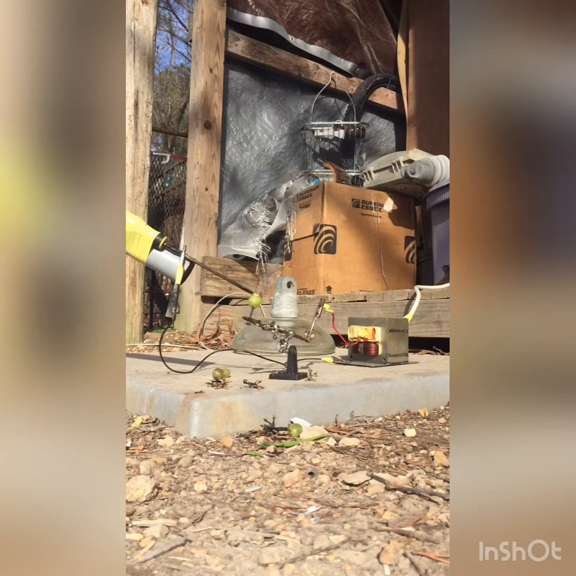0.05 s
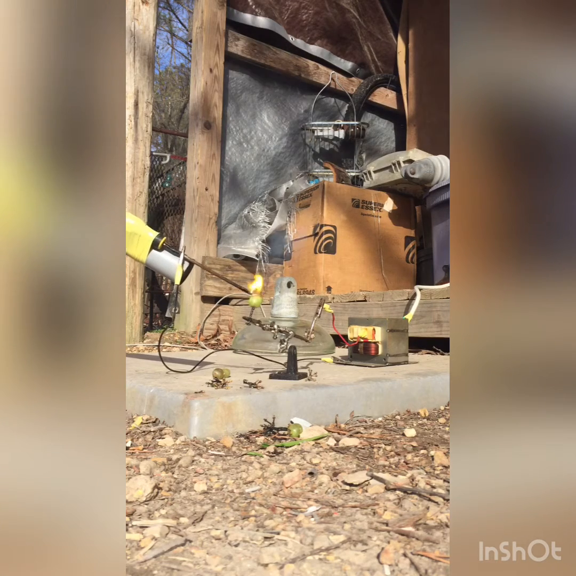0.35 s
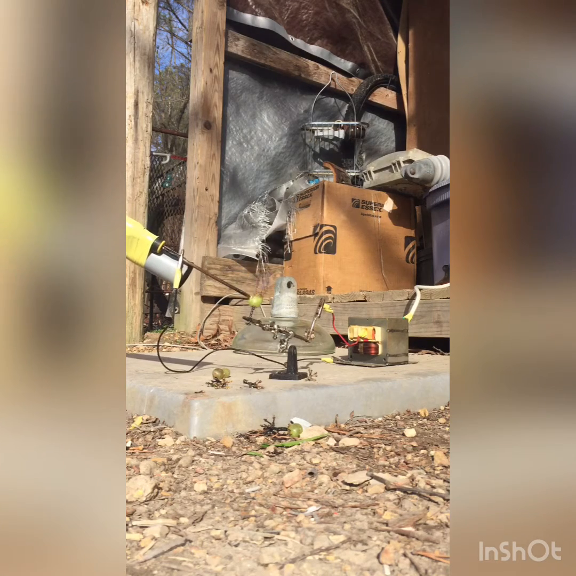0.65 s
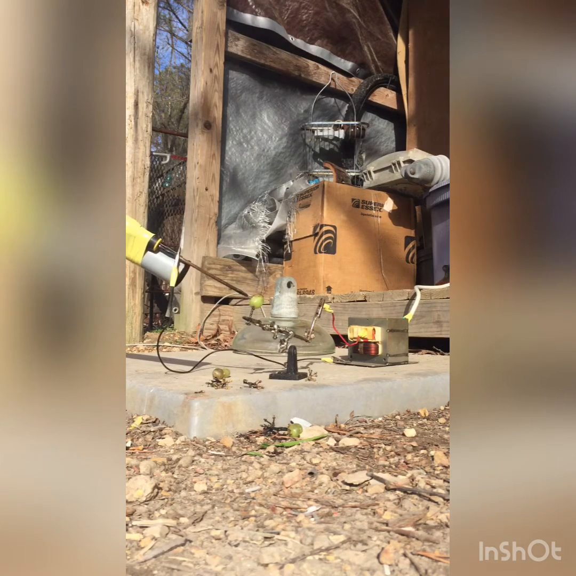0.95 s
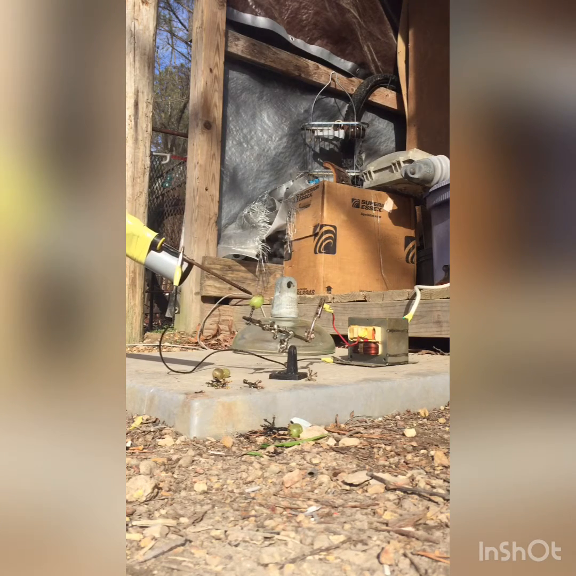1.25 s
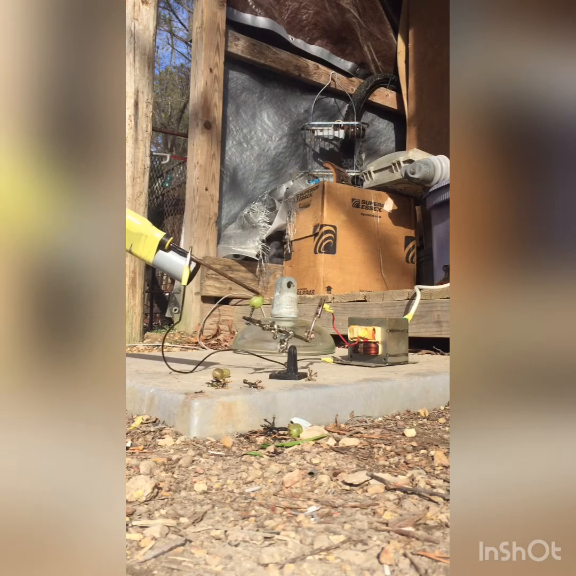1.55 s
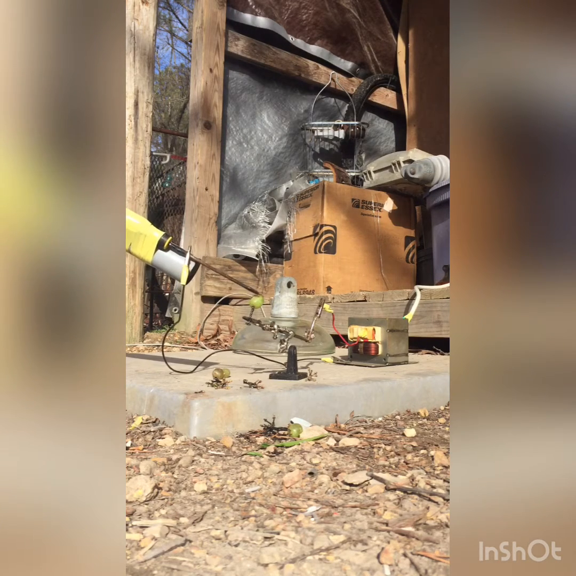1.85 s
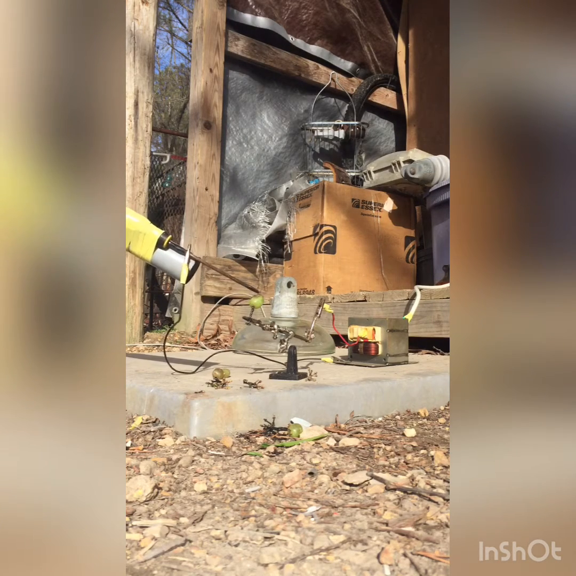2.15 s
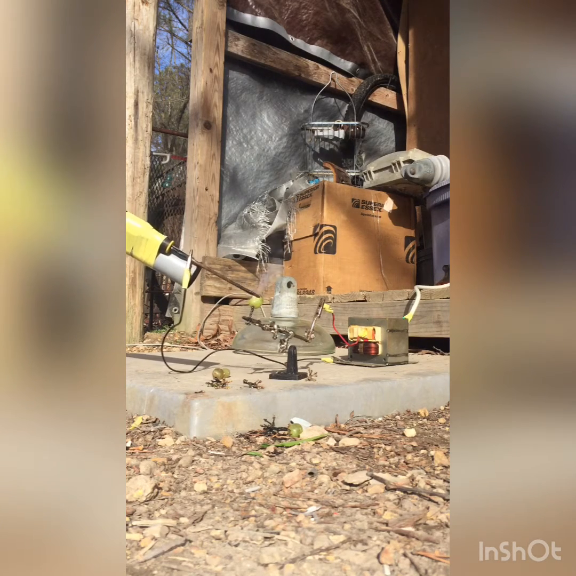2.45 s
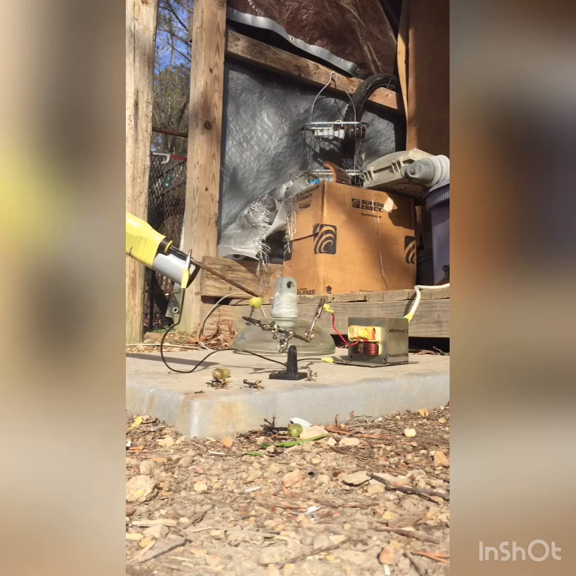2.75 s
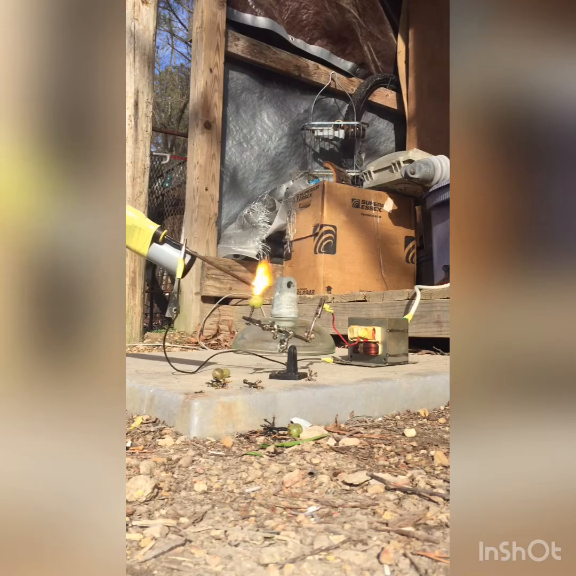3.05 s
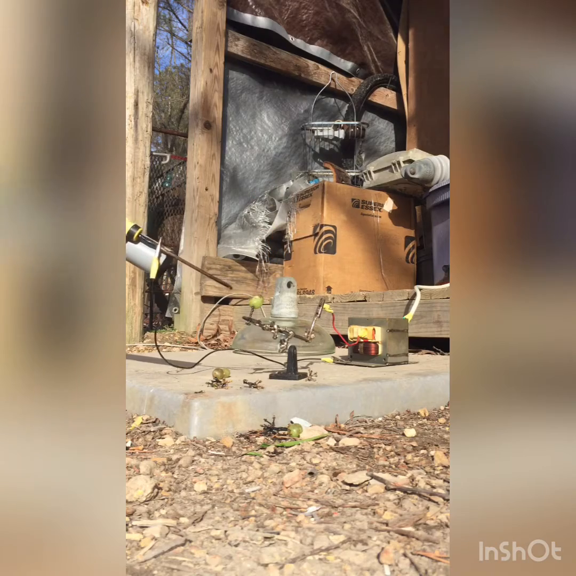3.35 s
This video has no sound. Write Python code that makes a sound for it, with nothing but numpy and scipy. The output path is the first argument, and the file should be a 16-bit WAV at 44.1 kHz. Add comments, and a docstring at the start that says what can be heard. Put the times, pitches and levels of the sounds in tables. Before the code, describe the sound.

Close electric arcing crackles in an uneven burst with sharp snaps, leaving only a low motor drone and a faint, distant bird in a yard. Two more spits follow, then a rising mains buzz that cuts off.

```python
"""Outdoors by a shed, a brief hiss dies away over a droning motor and a far bird calls.
A hand-held electrode draws a mains arc from a transformer. Each half cycle relights the gap: it
sizzles, snaps and sets off a short hollow ring, while the hot air hums at twice the mains rate.
The arc stops, the bird calls again and a soft rumble passes. Then a second arc is drawn:
it spits twice, stretches into a smooth, swelling buzz and goes out."""
import sys
import numpy as np
from scipy import signal
from scipy.fft import rfft, irfft
from scipy.io import wavfile
from scipy.ndimage import uniform_filter1d

SR = 44100
rng = np.random.default_rng(int(sys.argv[2]) if len(sys.argv) > 2 else 0)


def store_wav(level_fs):
    """Save 16-bit WAV to argv[1]."""
    pcm = np.round(np.clip(np.atleast_2d(level_fs), -1, 1) * 32767)
    wavfile.write(sys.argv[1], SR, pcm.T.astype(np.int16))


N = 158760
MAINS_HZ = 60


def undb(db):
    """Decibels to gain."""
    return 10 ** (np.asarray(db) / 20)


def unit(x):
    """Scale to rms 1."""
    return x / np.sqrt(np.mean(x ** 2))


def clock():
    """Time of every sample."""
    return np.arange(N) / SR


def noise():
    """White noise, the length of the scene."""
    return rng.standard_normal(N)


def fade(t60_s):
    """Exponential decay from 1."""
    return np.exp(-np.log(1000) * clock() / t60_s)


def through(x, response):
    """Pass a sound through an impulse response."""
    return signal.fftconvolve(x, response)[:N]


def filtered(x, order, hz, kind):
    """Low-, high- or band-pass a sound."""
    return signal.sosfilt(signal.butter(order, hz, kind, fs=SR, output="sos"), x)


def colour(points, size=2048):
    """Impulse response of unit energy that follows an EQ curve."""
    hz, db = np.array(points).T
    bins = np.maximum(np.fft.rfftfreq(size, 1 / SR), 1)
    curve_db = np.interp(np.log(bins), np.log(hz), db)
    cepstrum = irfft(np.log(undb(curve_db)))
    cepstrum[1:size // 2] *= 2  # minimum phase keeps the attack sharp
    cepstrum[size // 2 + 1:] = 0
    return unit(irfft(np.exp(rfft(cepstrum)))) / np.sqrt(size)


def walk(rate_hz):
    """Random drift, spread near 1."""
    hold = int(SR / rate_hz)
    steps = rng.standard_normal(N // hold + 1)
    return uniform_filter1d(np.repeat(steps, hold), hold)[:N]


def clicks(times, sizes):
    """One impulse at each time."""
    return np.bincount(np.clip(times * SR, 0, N - 1).astype(int), sizes, N)


def swell(times, level_db):
    """Gain along a level curve, silent outside it."""
    t = clock()
    return undb(np.interp(t, times, level_db)) * (t > times[0]) * (t < times[-1])


def opening_hiss(level_db=-46.5, t60_s=.25):
    """A hiss dies away, coloured like the crack and ring of the sparks."""
    hiss = through(noise(), colour(CRACK_EQ)) + undb(5.5) * through(noise(), colour(RING_EQ))
    return undb(level_db) * fade(t60_s) * hiss


# Partials of the motor, before its trim: pitch_hz, level_db
MOTOR_PARTIALS = [(58.6, -54.5), (85.9, -52.5), (120.3, -51.5), (171, -48.5), (240.6, -51.5), (360.1, -58),
                  (720.1, -68)]
def motor(trim_db=-3.5, waver_db=2):
    """A motor drones, each partial wavering in level and phase."""
    drone = np.zeros(N)
    for pitch_hz, level_db in MOTOR_PARTIALS:
        gain = undb(level_db + trim_db + waver_db * walk(28))
        drone += gain * np.sin(2 * np.pi * pitch_hz * clock() + walk(4.7))
    return np.sqrt(2) * drone


# Bass-heavy tone of the outdoor air: frequency_hz, gain_db
YARD_EQ = [(25, -23), (50, -7.5), (90, -4), (170, -9.5), (260, -8.5), (330, -24.5), (430, -34.5),
           (800, -34), (1500, -41.5), (6000, -46), (16000, -56.5)]
def yard_air(level_db=-50.5, waver_db=.7):
    """A low bed of outdoor noise, gently wavering."""
    return undb(level_db + waver_db * walk(5)) * through(noise(), colour(YARD_EQ))


# Faint calls of the far bird: middle_s, level_db
BIRD_CALLS = [(.11, -63.5), (1.158, -67)]
def bird(pitch_hz=1536, width_hz=110, spread_s=.07):
    """Hoarse calls blurred by distance: a narrow band of noise fades in and out."""
    voice = unit(signal.lfilter(*signal.iirpeak(pitch_hz, pitch_hz / width_hz, SR), noise()))
    return voice * sum(undb(db) * np.exp(-.5 * ((clock() - s) / spread_s) ** 2) for s, db in BIRD_CALLS)


# Breakdowns of the gap: start_s, length_s, shower_db, thump_db
FLARES = [(0.198, 0.0049, -20, -21.5), (0.732, 0.0047, -7, -10), (0.919, .003, -19.5, -23),
          (0.965, 0.0059, -12.5, -26.5), (2.4798, 0.005, -12.5, -31), (2.848, 0.0037, -23, -25.5)]
def with_flares(gain):
    """The gap breaks down in dense showers of sparks: short bursts on top of the sizzle's gain."""
    t = clock()
    for start_s, length_s, shower_db, _ in FLARES:
        gain = np.hypot(gain, undb(shower_db) * (t > start_s) * (t < start_s + length_s))
    return gain


# Mix of the arc, each row held until the next: start_s, sizzle_db, crackle_db, hum_db
ARC_STAGES = [(0.201, -25, -34, -19.5), (0.216, -19, -27.5, -23), (0.451, -29, -33.5, -26.5),
              (.590, -31.5, -32, -29), (0.642, -27, -28, -29), (0.737, -19, -26, -22.5),
              (0.875, -42.5, -43, -30), (.916, -22.5, -27.5, -21.5), (0.974, -92.5, -84.5, -95),
              (2.481, -22, -27.5, -24), (2.622, -49, -46.5, -89.5), (2.85, -20, -26.5, -23),
              (2.959, -49, -51, -86), (3.305, -53.5, -56, -90), (3.34, -67, -78, -88)]
def arc_gains(times):
    """Sizzle, crackle and hum gains; the near-silent last row also holds before the first strike."""
    rows = np.array(ARC_STAGES)
    current = np.searchsorted(np.sort(rows[:, 0]), times) - 1
    return undb(rows[current, 1:]).T


def relightings(first_s=.0011):
    """The gap relights every half cycle: the times, and 1 where the half cycle is the weak one."""
    count = np.arange(int(N / SR * 2 * MAINS_HZ))
    return first_s + count / (2 * MAINS_HZ), count % 2


# Bright, frying tone of the tiny sparks: frequency_hz, gain_db
SIZZLE_EQ = [(900, -38), (1420, -19.5), (1720, -9.5), (2100, -16), (2300, -9), (2650, -19), (3300, -6.5),
             (5400, -2), (6800, -1.5), (7700, -12.5), (9400, 0), (10400, -4.5), (11600, 1), (13000, -6),
             (16000, -10)]
def sizzle(puff_spread_s=.0017, weak_half_db=-9, scatter_db=1.68, floor_db=-18.5,
           grain_db=4, spit_db=3, dull_below_db=-33):
    """A puff of tiny sparks each half cycle, stronger on one polarity."""
    times, weak = relightings()
    sizes = undb(weak_half_db * weak + scatter_db * rng.standard_normal(len(times)))
    puff = signal.windows.gaussian(SR // MAINS_HZ, puff_spread_s * SR)
    puffs = signal.fftconvolve(clicks(times, sizes), puff, "same")
    gain = with_flares(unit(puffs + undb(floor_db)) * arc_gains(clock())[0])
    shower = gain * unit(noise() * undb(grain_db * noise() + spit_db * walk(2500)))
    brightness = gain / (gain + undb(dull_below_db))  # a weak arc loses its treble
    dull = filtered(shower * (1 - brightness), 1, 6000, "low")
    return through(shower * brightness + dull, colour(SIZZLE_EQ))


# Sharp attack of a spark: frequency_hz, gain_db
CRACK_EQ = [(500, -20), (1700, -14.5), (2600, -10.5), (3400, -3), (5300, 1.5), (6600, 0), (7600, -14),
            (9300, -1.5), (10600, -8), (11500, -10.5), (12800, -11), (16000, -13)]
# Hollow body of a spark: frequency_hz, gain_db
RING_EQ = [(60, -17), (185, 3.5), (250, -11), (345, -2), (460, -5), (550, -10.5), (730, 2), (860, -13),
           (990, -1), (1075, 4), (1200, -10.5), (1420, -30.5), (1680, -12), (2000, -17), (2600, -22.5),
           (8000, -60.5)]
def sparks(times, crack_gains, ring_gains, ring_lag_s=.00037, detune=.014):
    """Each spark is one pressure pulse: a crack, then a ring whose pitch shifts as the arc wanders."""
    rings = np.zeros(2 * N)
    for start_s, gain, shift in zip(times, ring_gains, rng.standard_normal(len(times))):
        ring = colour(np.array(RING_EQ) * [1 + detune * shift, 1])
        start = max(int((start_s + ring_lag_s) * SR), 0)
        rings[start:start + len(ring)] += gain * ring
    cracks = through(clicks(times, crack_gains), colour(CRACK_EQ))
    return -cracks - rings[:N]


# Single sharp sparks: start_s, crack_db, ring_db
SNAPS = [(0.2007, -1.5, 5), (0.4011, 3, 8), (0.4246, 5, 0), (0.4338, 4.5, 0), (0.4506, -2, 2.5),
         (0.4666, -6.5, 5.5), (0.485, -7.5, -1.5), (0.5014, 0, 8.5), (0.518, 2.5, 6.5), (0.5329, -3, 4.5),
         (0.5511, 4.5, 4.5), (0.5684, 0.5, 7), (0.584, -5.5, 1.5), (0.6171, 0, 4.5), (0.6505, 4, 7.5),
         (0.6661, 2, 5), (0.6834, 3, 1.5), (0.7006, 0.5, 5.5), (0.7351, -3, 8.5), (0.8767, 1, 7),
         (0.8951, -4, 4.5), (0.9356, 4.5, 6), (0.9519, 5.5, 7), (0.9681, 1.5, -0.5), (2.4845, 6.5, 11.5),
         (2.6184, -1, 5), (2.851, 3.5, 10)]
def snaps():
    """The big sparks that stand out of the crackle."""
    start_s, crack_db, ring_db = np.array(SNAPS).T
    return sparks(start_s, undb(crack_db), undb(ring_db))


def crackle(lag_s=.0008, jitter_s=.0009, scatter_db=4, weak_half_db=7.5,
            crack_db=-4.5, crack_scatter_db=10):
    """Small, uneven sparks, one a half cycle, tend to trail the puff and favour the weak half."""
    times, weak = relightings()
    size, shift, sharpness = rng.standard_normal((len(times), 3)).T
    start_s = times + lag_s + jitter_s * shift
    sizes = unit(undb(scatter_db * np.tanh(size) + weak_half_db * weak))
    ring_gains = arc_gains(start_s)[1] * sizes * np.sqrt(N / len(times))
    crack_ratios = undb(crack_db) * unit(undb(crack_scatter_db * np.tanh(sharpness)))
    return sparks(start_s, crack_ratios * ring_gains, ring_gains)


# Overtones that turn the hum into a buzz: harmonic_number, relative_db
BUZZ_OVERTONES = [(2, -3), (3, 0.5), (4, -7.5), (5, -8), (6, 0.5), (7, -15.5), (8, -8.5), (9, -13.5),
                  (10, -24.5), (14, -27.5)]
# The last arc burns calmly, then is drawn out until it breaks: time_s, hum_db, buzz_db
ARC_STRETCH = [(2.62, -44, -50.5), (2.84, -40, -53), (2.97, -36.5, -50.5), (3.07, -37, -48),
               (3.17, -28.5, -40.5), (3.259, -19.5, -36), (3.31, -16, -48.5), (3.342, -21, -35.5)]
def hum(lag_s=.0028, smoothing_s=.006, waver_db=3.5, flutter_db=1.7):
    """The channel of air heats twice a mains cycle; overtones show as it stretches."""
    time_s, hum_db, buzz_db = np.array(ARC_STRETCH).T
    phase = 2 * np.pi * 2 * MAINS_HZ * (clock() - lag_s)
    buzz = np.zeros(N)
    for harmonic, relative_db in BUZZ_OVERTONES:
        gain = undb(relative_db + waver_db * walk(6.6))
        buzz += gain * np.cos(harmonic * phase + 2 * np.pi * rng.random())
    fluttering = arc_gains(clock())[2] * undb(flutter_db * walk(60))
    gains = np.array([fluttering + swell(time_s, hum_db), swell(time_s, buzz_db)])
    hum_gain, buzz_gain = uniform_filter1d(gains, int(smoothing_s * SR))
    return np.sqrt(2) * (hum_gain * np.cos(phase) + buzz_gain * buzz)


def thumps(thump_hz=58, pop_hz=345, pop_db=2.5):
    """Air expands suddenly after each flare: a deep thump with a quick pop on top."""
    start_s, length_s, _, thump_db = np.array(FLARES).T
    thump = fade(t60_s=.051) * np.sin(2 * np.pi * thump_hz * clock())
    pop = undb(pop_db) * fade(t60_s=.013) * np.sin(2 * np.pi * pop_hz * clock())
    return -through(clicks(start_s + length_s, undb(thump_db)), thump + pop)


def echoes(x, shed_db=-9, trees_db=-35.5):
    """Quick scatter from the shed and a faint, duller tail from the trees."""
    shed = filtered(noise(), 2, 400, "high") * fade(t60_s=.11)
    trees = filtered(noise(), 1, [300, 4970], "band") * fade(t60_s=.93)
    return through(x, undb(shed_db) * unit(shed) + undb(trees_db) * unit(trees)) / np.sqrt(N)


def rumble(start_s=1.4, gain_db=-34.5, centre_hz=95, rise_s=.024, t60_s=.18):
    """Soft, low noise swells and fades in the distance."""
    age = np.maximum(clock() - start_s, 0)
    low = unit(filtered(noise(), 2, [centre_hz / 2, centre_hz * 2], "band"))
    envelope = (1 - np.exp(-age / rise_s)) * np.exp(-np.log(1000) * age / t60_s)
    return undb(gain_db) * low * envelope


def scene():
    """The arc and its echoes in front, the yard behind, in mono."""
    arc = sizzle() + crackle() + snaps() + thumps() + hum()
    return (arc + echoes(arc) + motor() + yard_air() + opening_hiss() + rumble() + bird())[None]


def record(dry, low_hz=38, top_hz=15850):
    """Thin the deep bass, clip at full scale and cut the top."""
    clipped = np.clip(filtered(dry, 2, low_hz, "high"), -1, 1)
    return signal.sosfilt(signal.ellip(10, .2, 70, top_hz, fs=SR, output="sos"), clipped)


dry = scene()
out = record(dry)
store_wav(out)
```